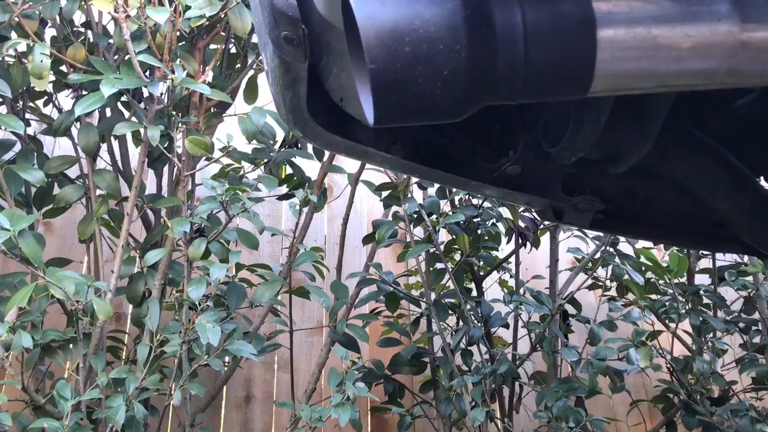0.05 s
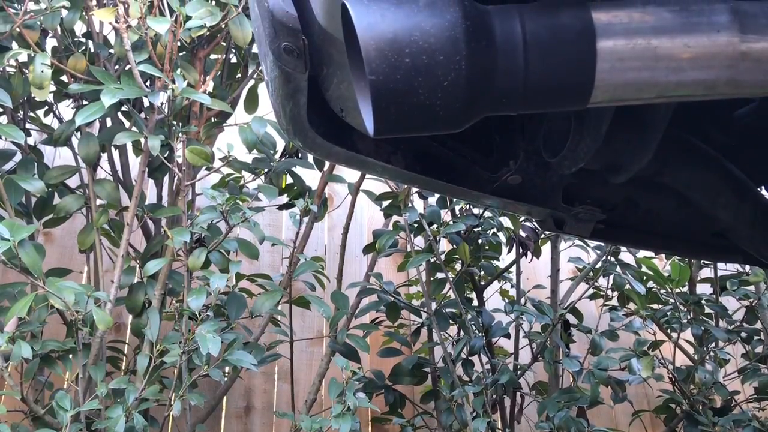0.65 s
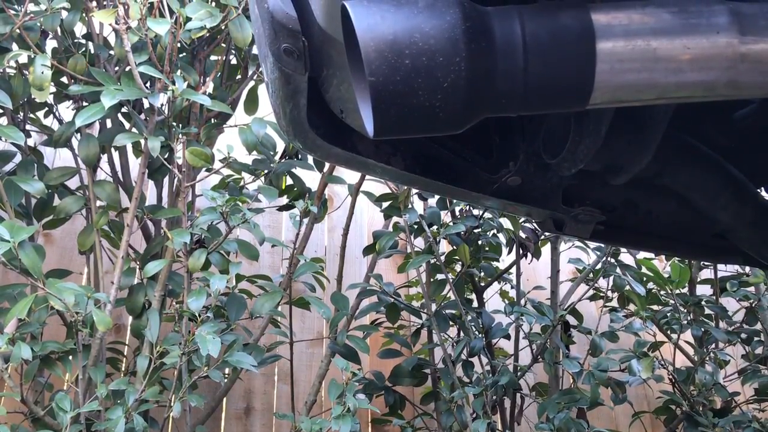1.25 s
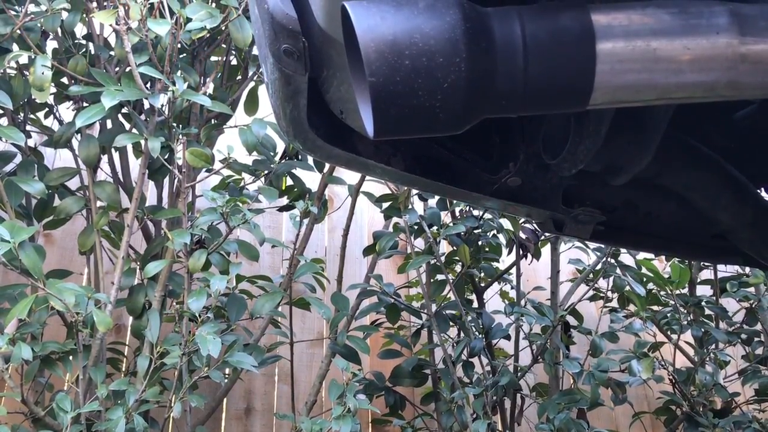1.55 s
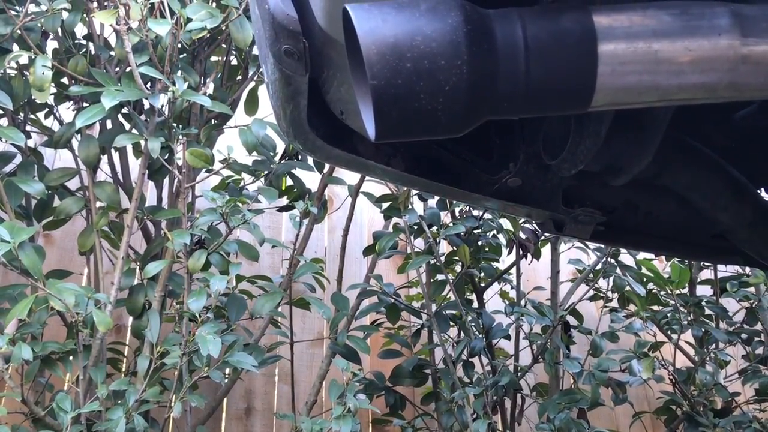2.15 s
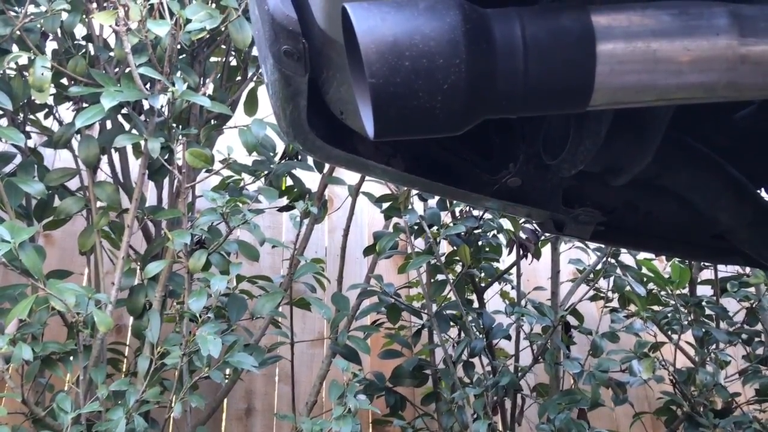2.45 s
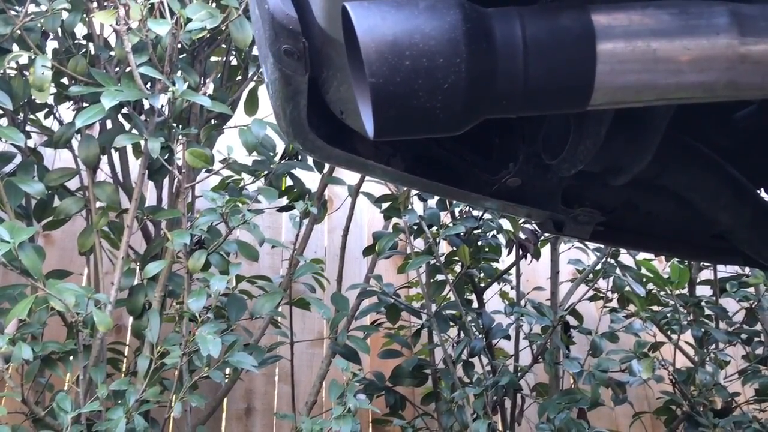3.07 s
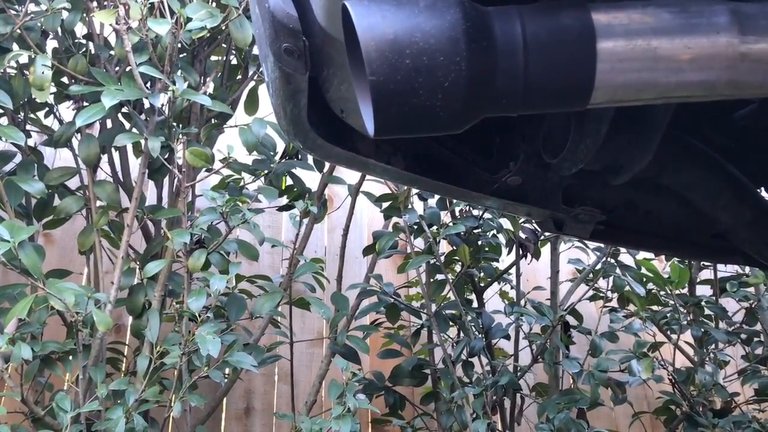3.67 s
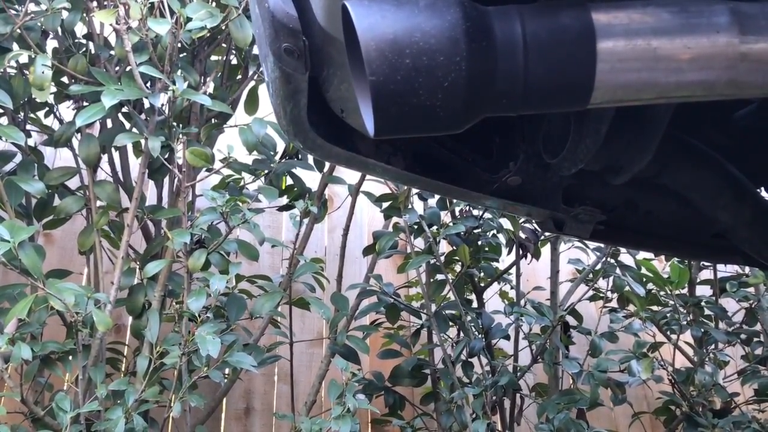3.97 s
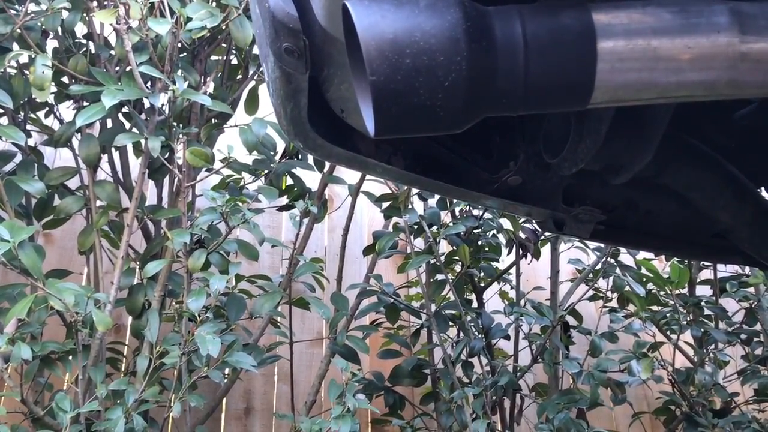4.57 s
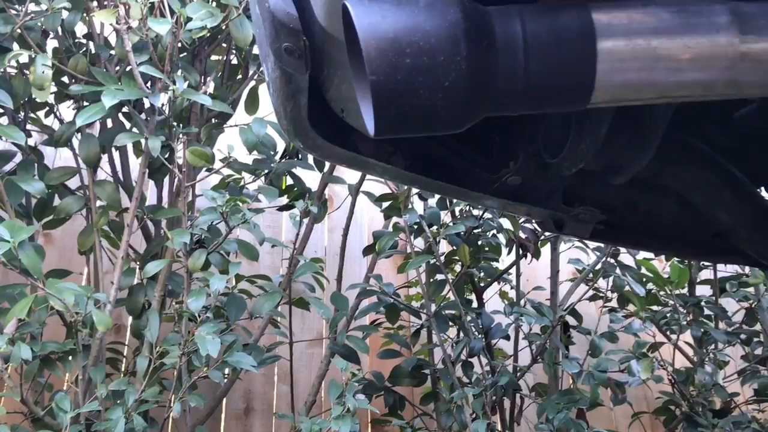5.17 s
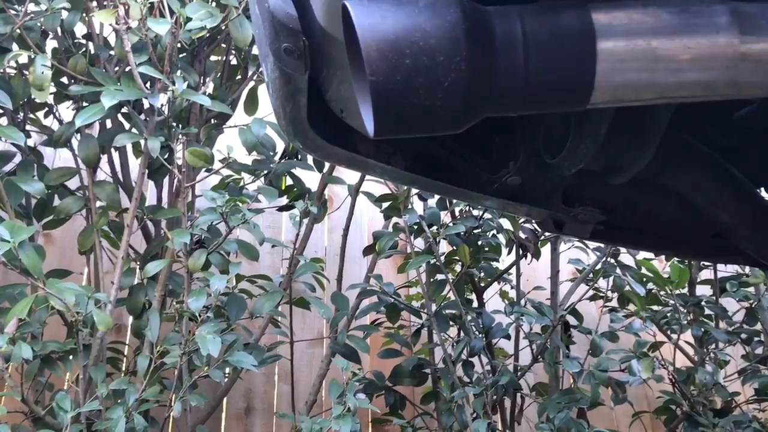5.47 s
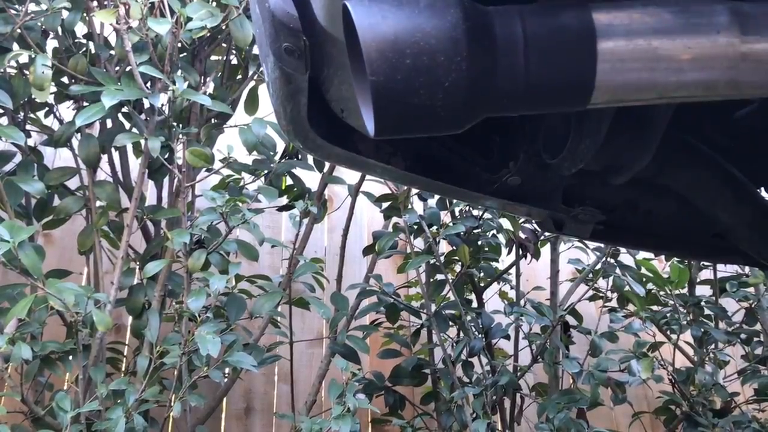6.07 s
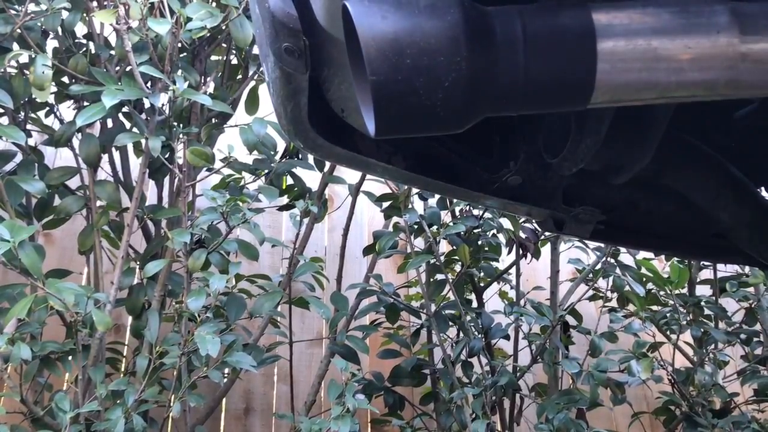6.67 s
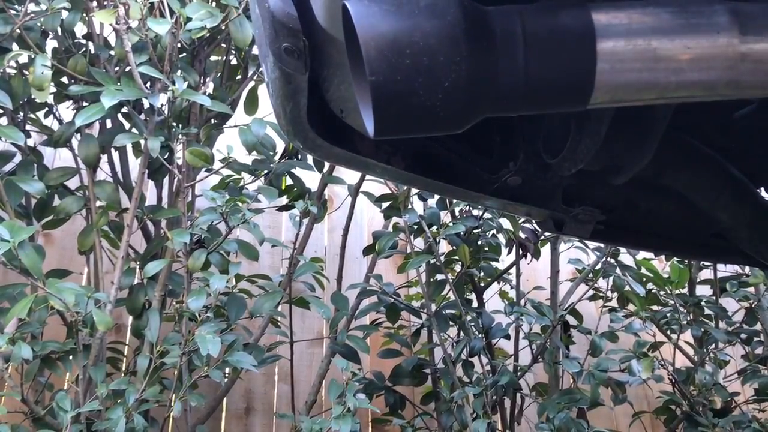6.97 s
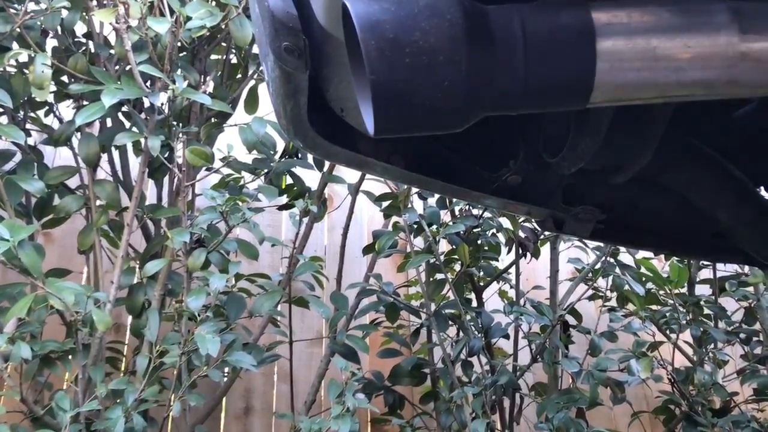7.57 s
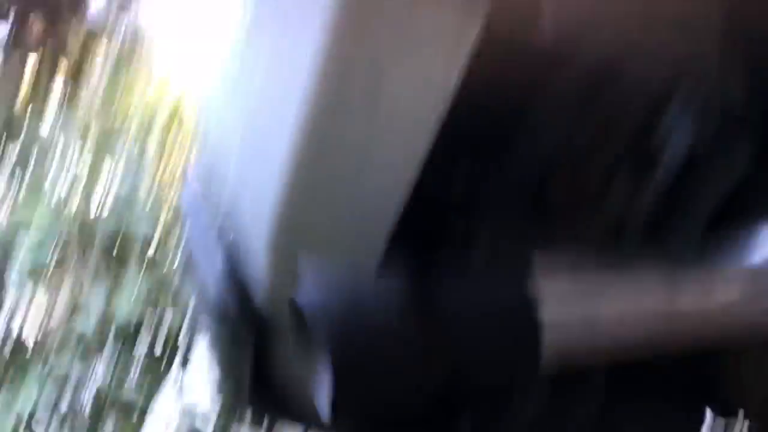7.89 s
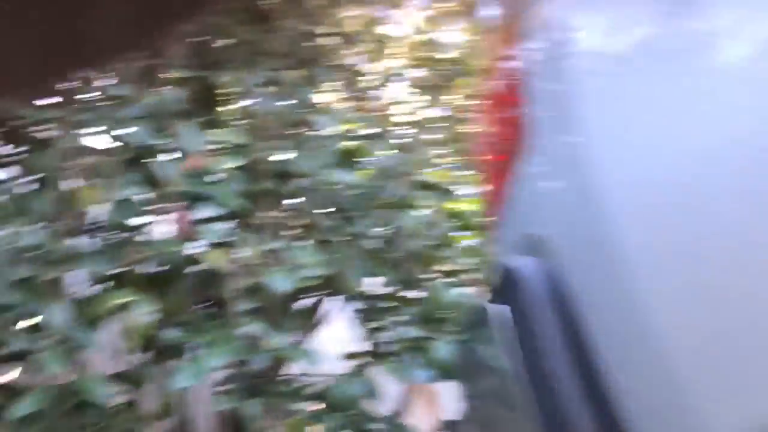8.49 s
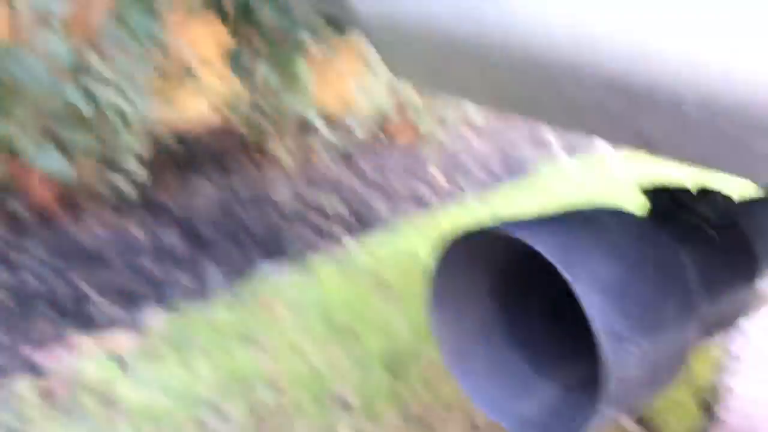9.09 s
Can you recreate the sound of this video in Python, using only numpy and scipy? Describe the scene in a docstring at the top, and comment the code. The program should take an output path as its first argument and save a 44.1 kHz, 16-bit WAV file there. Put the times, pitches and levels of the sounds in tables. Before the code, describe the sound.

Outdoors, a few soft scuffs sound over faint distant traffic. A pickup's starter grinds and whines for under a second, then the V8 engine catches with a boom, runs fast briefly and sinks into a deep, loping idle. The microphone sits close to the tailpipe. Near the end a few small handling ticks come as it is moved, and the exhaust turns duller for a moment before opening up again.

```python
"""A V8 pickup starts from cold beside a garden fence, heard close to its tailpipe.
First a few scuffs sound over distant traffic. At 1.5 s the starter slams in and grinds, its gear
teeth forcing the housing into resonance. At 2.2 s the engine catches with a boom, runs fast, then
sinks to a deep idle that lopes because unequal cylinders drive the pipe. Near the end the microphone
is picked up with a few ticks and carried round the pipe, where the bumper shades the higher tones."""
import sys
import numpy as np
from scipy import signal
from scipy.fft import rfft, irfft
from scipy.io import wavfile
from scipy.ndimage import uniform_filter1d, minimum_filter1d

SR = 44100
rng = np.random.default_rng(int(sys.argv[2]) if len(sys.argv) > 2 else 0)


def transcribe(u):
    """Save the signal u as a 16-bit wav file named by the first command-line argument.

    u: samples, shape (n,) or (channels, n), limited to [-1, 1]; the rate is SR.
    q: integer samples, one column per channel.
    """
    v = np.clip(np.atleast_2d(u).T, -1, 1)
    q = np.round(v * 32767).astype(np.int16)
    wavfile.write(sys.argv[1], SR, q)


N = 411894
T = np.arange(N) / SR
HZ = np.fft.rfftfreq(N, 1 / SR)


def amp(db):
    """Amplitude ratio of a level in decibels."""
    return 10 ** (np.asarray(db) / 20)


def unit(x):
    """Normalisation to rms 1."""
    return x / np.sqrt(np.mean(abs(x) ** 2) + 1e-20)


def power_sum(*gains):
    """Incoherent sources add in power."""
    return np.sqrt(sum(gain ** 2 for gain in gains))


def curve(rows, column=1):
    """Linear interpolation of one column in time."""
    rows = np.asarray(rows, float)
    return np.interp(T, rows[:, 0], rows[:, column])


def envelope(start, end, rise, fall):
    """Gaussian rise to 1 at start, a hold until end, then exponential decay."""
    return np.exp(-(np.minimum(T - start, 0) / rise) ** 2 - np.maximum(T - end, 0) / fall)


def response(points):
    """Magnitude response through (Hz, dB) points on a logarithmic frequency axis."""
    hz, db = np.transpose(points)
    return amp(np.interp(np.log(HZ + 1), np.log(hz), db))


def colour(x, gain):
    """Filtering by multiplication of spectra; the result has rms 1."""
    return unit(irfft(rfft(x) * gain, N))


def noise():
    """White Gaussian noise."""
    return rng.standard_normal(N)


def drift(rate_hz):
    """Random fluctuation of rms 1, joining rate_hz values a second."""
    knots = rng.standard_normal(4000)
    return unit(np.interp(T * rate_hz, np.arange(len(knots)), knots))


def grit(per_s, spread_db):
    """Shot noise: tiny impacts at random times, a few of them large."""
    impacts = (rng.random(N) < per_s / SR) * noise()
    return unit(impacts * amp(spread_db * np.minimum(rng.exponential(1, N), 4)))


def reflections(x, wet=0.6, decay_s=0.019, count=60):
    """Early reflections from ground, chassis and fence add to the direct sound."""
    delay_s = rng.uniform(.001, .05, count)
    taps = np.zeros(SR // 10)
    taps[(delay_s * SR).astype(int)] = rng.choice([-1, 1], count) * np.exp(-delay_s / decay_s)
    return unit(x + wet * signal.oaconvolve(x, taps / np.linalg.norm(taps))[:N])


# Traffic spectrum. Each row: frequency in Hz, relative level in dB.
TRAFFIC_SPECTRUM = [(15, -51.5), (25, -27), (71, -2.5), (90, -2.5), (140, -8.5), (204, -12.5), (241, -9.5),
                    (269, -19), (308, -17), (679, -31.5), (1020, -32), (2140, -39.5), (6190, -44.5),
                    (7700, -48.5), (17000, -54.5)]

def traffic(level_db=-46.5):
    """Distant traffic is low-frequency noise under slight amplitude modulation."""
    return colour(noise(), response(TRAFFIC_SPECTRUM)) * amp(level_db + .8 * drift(15))


# Soft scuffs. Each row: time in seconds, level in dB, rise and fall in seconds, tilt in dB per octave.
SCUFF_EVENTS = [(.07, -64, 0.022, 0.035, 6), (.58, -52.5, 0.013, 0.049, -1),
                (0.656, -42.5, 0.014, 0.036, -1), (1.03, -52.5, .015, 0.038, 0),
                (1.31, -53.5, 0.037, 0.032, -2.5), (1.38, -48, 0.034, 0.066, -1.5),
                (6.72, -49, 0.0091, 0.012, 5), (8.98, -57, 0.11, 0.13, 3), (9.199, -55, 0.025, 0.077, 4)]
# Their spectrum before tilting. Each row: frequency in Hz, relative level in dB.
SCUFF_SPECTRUM = [(250, -25), (600, 2), (1800, -5), (3000, -8), (5000, -14), (9000, -18), (16000, -32)]

def scuffs():
    """Friction is a swarm of tiny impacts, heard as brief swells of shot noise."""
    grains, spectrum = grit(6000, 1.6), response(SCUFF_SPECTRUM)
    octaves = np.log2(HZ / 1000 + .1)
    return sum(amp(db) * envelope(s, s, rise, fall) * colour(grains, spectrum * amp(tilt_db * octaves))
               for s, db, rise, fall, tilt_db in SCUFF_EVENTS)


# Knocks and handling ticks. Each row: start in seconds, peak in dB, centre in Hz, decay in seconds.
TICK_EVENTS = [(.279, -51, 500, 0.0034), (0.406, -34.5, 277, 0.0026), (0.408, -43, 700, 0.003),
               (7.561, -31, 9000, 0.0011), (8.148, -20.5, 1050, 0.0011), (8.1468, -35, 8000, 0.00083),
               (8.152, -30, 9000, .0006), (8.161, -35, 7000, .003), (8.201, -28, 3480, 0.002),
               (8.202, -23.5, 700, .002), (8.205, -32, 7000, 0.0022), (8.213, -23, 11000, 0.00054),
               (8.217, -25, 10000, .0005)]

def ticks(size=2048):
    """A brief impact has a broad spectrum: each is a noise burst in a critically damped band-pass."""
    out, t, hz = np.zeros(N), np.arange(size) / SR, np.fft.rfftfreq(size, 1 / SR)
    for s, db, centre_hz, decay in TICK_EVENTS:
        band = 1j * hz * centre_hz / (centre_hz + 1j * hz) ** 2
        tick = irfft(rfft(rng.standard_normal(size) * np.exp(-t / decay)) * band)
        out[round(s * SR):][:size] += amp(db) * tick / abs(tick).max()
    return out


# The pinion hits the ring gear. Each row: start and hold in seconds, grind, clatter and rasp in dB.
PINION_SLAMS = [(1.485, 0.032, -27.5, -22.5, -36), (1.942, 0.032, -27.5, -27.5, -49),
                (2.07, 0.02, -33.5, -25, -40)]
# Piston strokes while cranking. Each row: start in seconds, level of the pumped air in dB.
PISTON_STROKES = [(1.545, -31), (1.77, -31), (1.951, -33), (2.1, -33.5)]

def cranking_gains(motor, overrun):
    """Steady cranking, slams, piston load and overrun add in power to set the starter's noises."""
    strokes = sum(amp(db) * envelope(s, s + 0.016, 0.024, 0.063) for s, db in PISTON_STROKES)
    slam_grind, slam_clatter, slam_rasp = sum(
        np.outer(amp(levels_db), envelope(s, s + hold, 0.013, 0.026))
        for s, hold, *levels_db in PINION_SLAMS)
    grind = power_sum(amp(-35.5) * motor, slam_grind, amp(-2.5) * strokes)
    clatter = power_sum(amp(-32.5) * motor, slam_clatter, amp(-30.5) * overrun)
    rasp = power_sum(slam_rasp, amp(-40.5) * overrun)
    rumble = amp(-40) * envelope(1.3, 1.41, 0.017, 0.022)  # just before the starter
    return grind, clatter, rasp, strokes + rumble


# Starter speed swings with the compressions. Each row: time in seconds, tooth rate in Hz, whine in dB.
TOOTH_MESH = [(1.47, 1195, -34), (1.55, 1214, -35), (1.59, 1290, -52), (1.63, 1362, -31), (1.7, 1370, -33),
              (1.755, 1580, -30), (1.79, 1330, -52), (1.84, 1184, -32), (1.89, 1300, -55),
              (1.97, 1683, -38), (2.09, 1557, -43.5), (2.2, 1300, -48), (2.3, 1373, -38)]
# Modes of bell housing and starter body. Each row: frequency and bandwidth in Hz, gain in dB.
HOUSING_MODES = [(680, 20, -4.5), (842, 12, 5), (889, 19, -3), (1070, 18, -2), (1226, 19, 4),
                 (1305, 18, 4.5), (1367, 10, 5.5), (1480, 14, 3), (1570, 23, 7), (1692, 9.3, 5),
                 (2570, 14, -8), (2696, 14, -3), (3320, 10, -5), (4680, 12, -5), (6010, 19, 2),
                 (12523, 14, -9)]
# Spectra of gear grind and metal clatter. Each row: frequency in Hz, relative level in dB.
GRIND_SPECTRUM = [(150, -34), (260, 0.5), (450, -1), (700, -6), (1000, -2), (1400, -4.5), (1750, -15.5),
                  (2100, -5), (3500, -43)]
CLATTER_SPECTRUM = [(1100, -32), (1800, -12.5), (2300, -2.5), (2700, 0.5), (3700, -4), (4400, 0.5),
                    (4900, -2.5), (5400, 0.5), (7100, -2.5), (7700, -5), (9500, -9.5), (10500, -20),
                    (12700, -18), (17000, -38)]

def starter(on_s=1.478, overrun_s=2.14, off_s=2.315, rise_s=0.0075, fall_s=0.037):
    """Forced vibration: meshing teeth whine, rattle and ring the housing while the pistons pump air."""
    motor = envelope(on_s, off_s, rise_s, fall_s)
    overrun = envelope(overrun_s, off_s, rise_s, fall_s)  # the firing engine outruns the pinion
    grind_gain, clatter_gain, rasp_gain, air_gain = cranking_gains(motor, overrun)
    mesh_phase = 2 * np.pi * np.cumsum(curve(TOOTH_MESH) * (1 + .016 * drift(250))) / SR
    tone = (np.sin(mesh_phase) + .1 * np.sin(2 * mesh_phase)) * unit(1 + .5 * drift(160))
    impacts = unit(grit(5000, 0.62) * (1 + 0.14 * np.cos(mesh_phase)))
    housing = sum(amp(db) / (1 + 2j * (HZ - hz) / width) for hz, width, db in HOUSING_MODES)
    # resonance: the whine swells whenever the tooth rate meets a mode
    whine = irfft(rfft(tone) * housing, N) + 0.54 * reflections(tone, wet=.5)
    ringing = colour(impacts, housing)
    grind = colour(reflections(grit(4000, 2.2)), response(GRIND_SPECTRUM))
    clatter = colour(reflections(impacts), response(CLATTER_SPECTRUM))
    rasp = colour(grit(6000, 2), response([(5000, -32), (9000, -1), (13000, 2.5), (17000, -9)]))
    air = colour(noise(), response([(25, -22), (55, 2), (100, 1), (200, -2.5), (330, -10), (700, -48)]))
    return (whine * motor * amp(curve(TOOTH_MESH, 2)) + (ringing + grind) * amp(-1) * grind_gain
            + clatter * clatter_gain + rasp * rasp_gain + air * air_gain)


# Sheet metal under the bonnet. Each row: resonance and bandwidth in Hz, lift in dB.
PANEL_MODES = [(2220, 110, 2.5), (2770, 200, 3), (4570, 140, 4.5), (5570, 200, 2.5), (8600, 300, 2)]
# Spectra of fan, belts and valves, and of the throttle. Each row: frequency in Hz, relative level in dB.
BAY_SPECTRUM = [(530, -25.5), (900, -2.5), (1510, -1.5), (1680, -7.5), (2180, -7.5), (2350, -6.5),
                (2790, -7.5), (4620, -8.5), (4970, -11.5), (5760, -10.5), (7190, -18), (8640, -17),
                (10500, -25), (12700, -23.5), (17000, -30.5)]
INTAKE_SPECTRUM = [(3000, -21.5), (5500, -1), (7000, 1.5), (7800, -12.5), (9700, -6), (10500, -21.5),
                   (12700, -19), (16000, -23.5)]

def engine_bay(firings, below_load_db=40.5, open_s=2.42, close_s=2.8, fade_db_per_s=19.5):
    """Broadband excitation: fan hiss, valve ticks and a brief rush of throttle air ring the panels."""
    valves = unit(grit(3000, 2.7) * firing_gate(firings, .2))
    panels = amp(sum(db / (1 + (2 * (HZ - hz) / width) ** 2) for hz, width, db in PANEL_MODES))
    hiss = colour(reflections(noise() + 0.31 * valves, wet=0.39), response(BAY_SPECTRUM) * panels)
    intake = colour(reflections(noise()), response(INTAKE_SPECTRUM) * panels)
    throttle = envelope(open_s, close_s, .05, .07) * amp(-52 - fade_db_per_s * (T - open_s))
    hiss_gain = power_sum(amp(curve(ENGINE_LOAD) - below_load_db), amp(1) * throttle)
    return hiss * hiss_gain + intake * throttle


# Eight cylinders in firing order; lags are fractions of one firing. Each row: lag and push in dB at
# slow idle, the same at fast idle, lag of the pulse's sharp edge, level of that edge in dB.
CYLINDER_PULSES = [(-0.032, -1.2, -.19, 3.5, -.2, -8), (-.07, 4, -0.303, -2, -.2, 1),
                   (-0.0158, 3.5, -0.116, 1.2, -.03, -2), (0.011, 3.5, -.22, 1, -.2, 1.5),
                   (.04, -9.5, -0.213, 2, -.17, 1), (-0.296, -7.5, -0.146, -0.05, .45, -3.5),
                   (-0.0718, 3.5, -.24, 4, -.1, -2.5), (-0.057, 2.43, -0.352, -4.5, -.17, -1.5)]

def firing_gate(firings, decay):
    """Exponential pulse train: each firing opens at its own cylinder's edge level and dies away."""
    edge_db = np.array(CYLINDER_PULSES)[:, -1]
    cylinder = np.floor(firings).astype(int) % len(CYLINDER_PULSES)
    return amp(edge_db[cylinder]) * np.exp(-(firings % 1) / decay)


def harmonic(order, lag, push_db):
    """Fourier coefficient of a cycle of unequal, unevenly spaced pushes."""
    return np.sum(amp(push_db) * np.exp(-2j * np.pi * order * (np.arange(len(lag)) + lag) / len(lag)))


# Engine load. Each row: time in seconds, level of the exhaust's boom in dB.
ENGINE_LOAD = [(2.47, -15), (2.85, -11), (3.25, -13), (3.55, -17), (4.3, -16.5), (5.05, -13.5), (8.6, -13),
               (9.2, -11.5)]
# Two surges at the catch. Each row: start, hold and fall in seconds, boom, burble and bark in dB.
CATCH_SURGES = [(2.216, 0.036, .02, -5.5, -18.5, -27), (2.311, 0.024, 0.082, -4.5, -12.5, -22)]
# The bumper's acoustic shadow. Each row: time in seconds, tilt in dB per octave, burble gain in dB.
BUMPER_SHADOW = [(7.4, 0, -0.5), (8, -1, -1), (8.3, -3.5, -2), (8.55, -8.5, -3), (8.8, -8.5, -3.5),
                 (9.05, 2, -4), (9.3, -0.5, -2.5)]
CATCH_S = 2.195

def exhaust_gains(mellow_db_per_s=0.2751):
    """Running and surges add in power; burble and bark mellow as the engine warms."""
    fast, mellow_db = fastness(), -mellow_db_per_s * (T - CATCH_S)
    burble_db = -17.5 + mellow_db - 2.5 * fast + curve(BUMPER_SHADOW, 2)
    bark_db = -41 + mellow_db + 1.5 * fast + 0.55 * curve(BUMPER_SHADOW)
    running = amp([curve(ENGINE_LOAD), burble_db, bark_db])
    damping = np.c_[[1, 1.8, 2.5]]  # a surge's brighter parts die first
    surges = [amp(np.c_[levels_db]) * envelope(s, s + hold, 0.029, fall / damping)
              for s, hold, fall, *levels_db in CATCH_SURGES]
    return power_sum(running, *surges)


def roughness(settle_s=.11):
    """Combustion is ragged until the last surge, then evens out exponentially."""
    return 0.045 + .4 * np.exp(-np.maximum(T - CATCH_SURGES[-1][0], 0) / settle_s)


# Spectra of the gas puffs and of their sharp edges. Each row: frequency in Hz, relative level in dB.
PUFF_SPECTRUM = [(20, -27.5), (45, -16.5), (80, -5.5), (160, -7), (260, 5), (380, -4.5), (520, -18),
                 (800, -54)]
BARK_SPECTRUM = [(250, -40), (350, -4.5), (410, 2), (510, -2), (620, -11), (800, -13), (1100, -24),
                 (1600, -37), (3000, -63.5)]

def exhaust_gas(firings, burble_gain, bark_gain, fast_lead=.2):
    """Pulsed turbulence: each firing puffs and barks, and the first blow a gust past the microphone."""
    firings = firings + fast_lead * fastness()  # pulses come earlier at fast idle
    gate = firing_gate(firings + .25, .35)
    puff_gain = roughness() * burble_gain * amp(curve(BUMPER_SHADOW) - 1)
    puffs = colour(noise() * (gate + 0.13), response(PUFF_SPECTRUM)) * puff_gain
    # each valve opens a little early or late, and never twice quite alike
    lag = np.array(CYLINDER_PULSES)[:, -2]
    opening = firings - np.interp(firings, np.arange(len(lag)), lag, period=len(lag)) + .014 * drift(78)
    impulses = np.diff(np.floor(opening), prepend=0) * firing_gate(opening, 1) * (1 + 0.064 * noise())
    edges = colour(impulses, response(BARK_SPECTRUM) / (1 + (HZ / 700) ** 4))
    turbulence = colour(noise() * (gate + 0.21), response(BARK_SPECTRUM))
    bark = unit(turbulence + 1.31 * edges) * bark_gain
    gust = colour(noise(), 1 / (1 + (HZ / 40) ** 4)) * amp(-20) * np.exp(-((T - 2.31) / 0.07) ** 2)
    return puffs + bark + gust


# Resonances of pipe and muffler. Each row: frequency and bandwidth in Hz.
PIPE_MODES = [(66, 31), (70, 46), (169, 103)]
# Exhaust harmonics. Each row: multiple of the cycle rate, relative dB at fast idle and at slow idle.
ENGINE_ORDERS = [(5, -14, -12), (6, -40, -39), (7, -20, -20), (8, 0, 0), (9, -36, -14), (10, -29, -21),
                 (11, -25, -22), (12, -38, -24), (13, -22, -17), (14, -20, -42), (15, -18, -26),
                 (16, -12, -11), (17, -36, -24), (18, -28, -12), (19, -40, -16), (20, -34, -19),
                 (21, -21, -14), (22, -29, -35), (23, -21, -27), (24, -28, -21), (25, -34, -31),
                 (26, -22, -23), (27, -34, -23), (28, -37, -29), (29, -38, -30), (30, -36, -27),
                 (31, -30, -31), (32, -34, -45), (33, -39, -41), (34, -31, -45), (35, -46, -28),
                 (36, -50, -32), (37, -43, -37), (38, -40, -30), (39, -37, -37)]

def exhaust_tone(firings, boom_gain, burble_gain, idle_hz=76.64, burble_hz=120, shadow_hz=170):
    """Periodic forcing of the pipe: harmonics of the eight-cylinder cycle beat into a loping note."""
    lag, push_db, fast_lag, fast_push_db, _, _ = np.transpose(CYLINDER_PULSES)
    fast, rough, tilt_db = fastness(), roughness(), curve(BUMPER_SHADOW)
    cycles = (firings + 0.25 * rough * drift(60)) / len(lag)
    bands, power = np.zeros((2, 2, N))  # boom below burble_hz, burble above
    for order, fast_db, slow_db in ENGINE_ORDERS:
        hz = order * idle_hz / len(lag)
        slow_push, fast_push = harmonic(order, lag, push_db), harmonic(order, fast_lag, fast_push_db)
        pipe = np.prod([1j * hz / (f ** 2 - hz ** 2 + 1j * hz * width) for f, width in PIPE_MODES])
        phase = np.angle(slow_push * pipe) + fast * np.angle(fast_push / slow_push)
        gain = amp(slow_db + fast * (fast_db - slow_db) + tilt_db * max(np.log2(hz / shadow_hz), 0))
        if hz < 55:  # the slow idle's deepest throb fades as the engine warms
            gain = gain * amp((6 - T) * (1 - fast))
        band = int(hz > burble_hz)
        bands[band] += gain * np.cos(2 * np.pi * order * cycles + phase)
        power[band] += gain ** 2 / 2
    boom, burble = bands / np.sqrt(power)
    return (boom * boom_gain * (1 + 1.1 * rough * drift(50))
            + burble * burble_gain * (1 + 1.1 * rough * drift(70)))


# Engine speed flares, then sinks to idle. Each row: time in seconds, firing rate in Hz.
FIRING_RATE = [(2.15, 82.5), (2.35, 86.43), (2.48, 100.8), (2.83, 92.14), (3.09, 92.71), (3.76, 82.31),
               (4.15, 77.75), (4.5, 78.37), (6.05, 77.76), (7.11, 78.04), (7.81, 77.28), (9.34, 76.58)]

def fastness():
    """Normalised engine speed: 0 at slow idle, 1 at fast idle."""
    return np.clip((curve(FIRING_RATE) - 79) / 11, 0, 1)


def engine(start_phase=.417):
    """Phase is the integral of frequency: one count of firings times both exhaust and valves."""
    running = T > FIRING_RATE[0][0]
    firings = np.cumsum(curve(FIRING_RATE) * running) / SR + start_phase
    caught = envelope(CATCH_S, T[-1], 0.023, 1)
    boom, burble, bark = exhaust_gains()
    exhaust = exhaust_tone(firings, boom, burble) + exhaust_gas(firings, burble, bark)
    return caught * (exhaust + engine_bay(firings))


def scene():
    """Superposition of truck, garden and handling at one microphone."""
    return (engine() + starter() + traffic() + scuffs() + ticks())[None]


def record(dry, ceiling=.99, window=300, cutoff_hz=17300):
    """The microphone opens, a fast limiter holds the peaks, and a steep low-pass ends the band."""
    opened = dry * np.clip((T - .033) / .003, .02, 1)
    safe_gain = ceiling / np.maximum(abs(opened), ceiling)
    limited = opened * uniform_filter1d(minimum_filter1d(safe_gain, window), window)
    low_pass = signal.firwin(511, cutoff_hz, window=("kaiser", 9), fs=SR)
    return signal.oaconvolve(limited, low_pass[None], "same")


dry = scene()
out = record(dry)
transcribe(out)
```